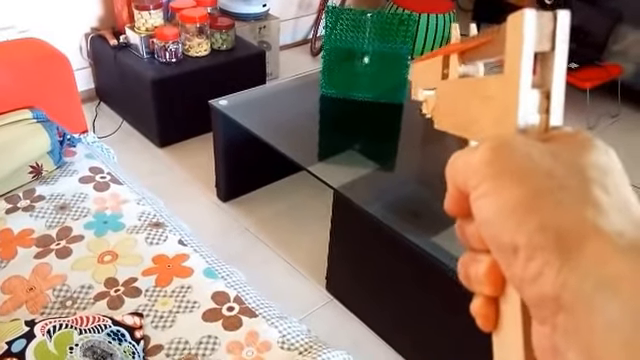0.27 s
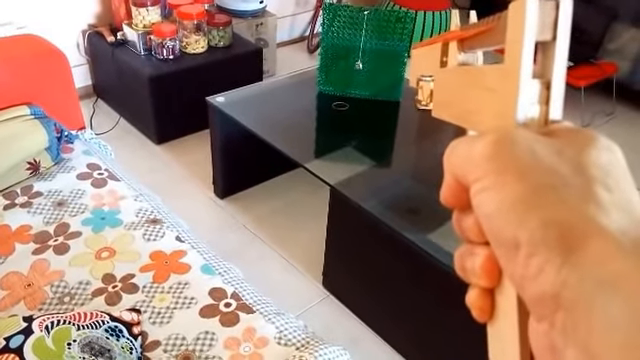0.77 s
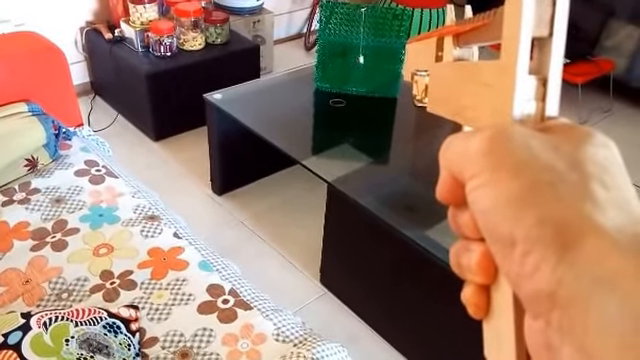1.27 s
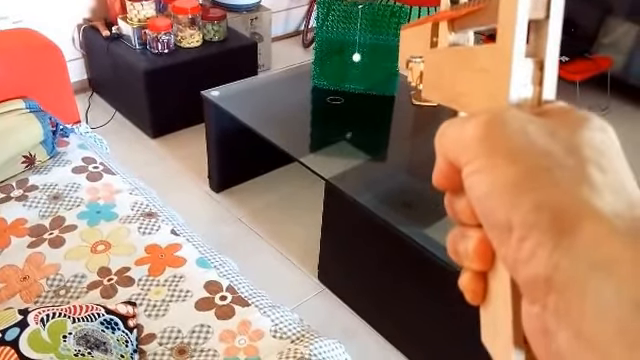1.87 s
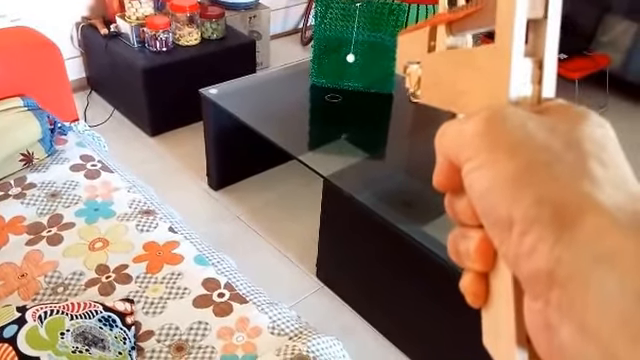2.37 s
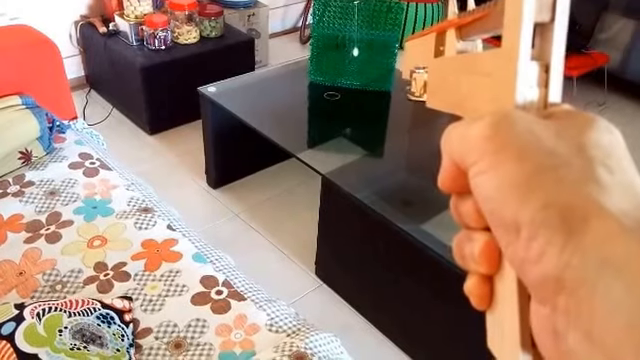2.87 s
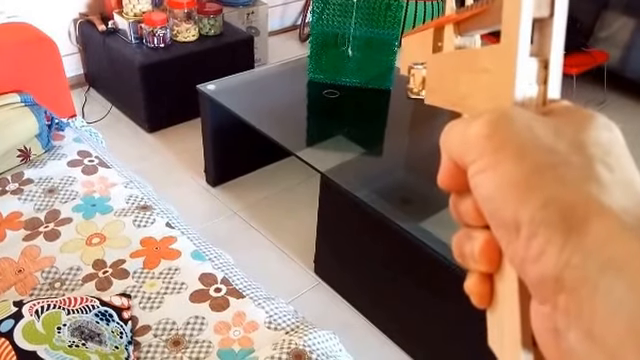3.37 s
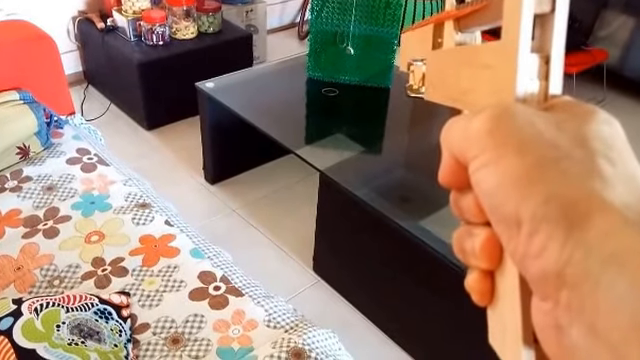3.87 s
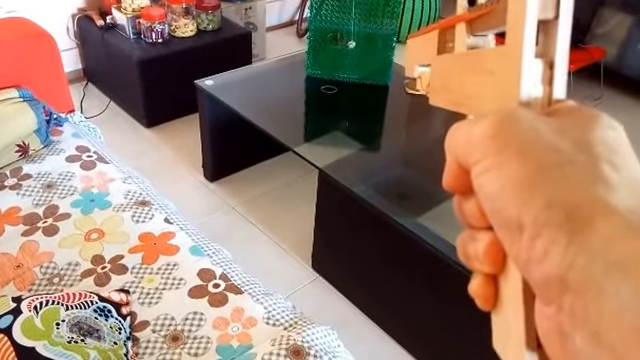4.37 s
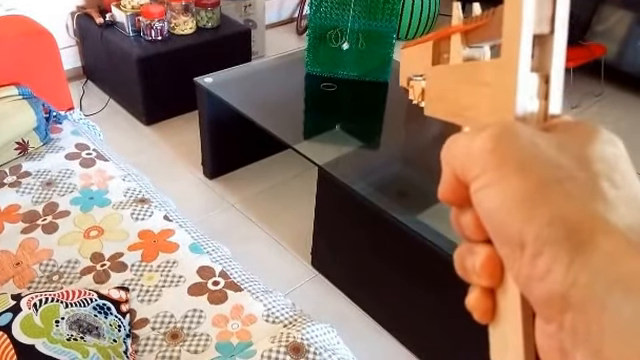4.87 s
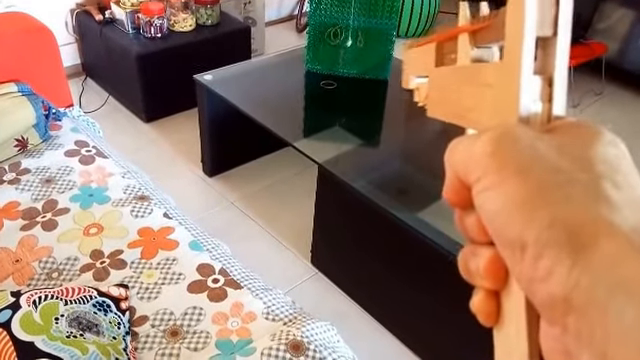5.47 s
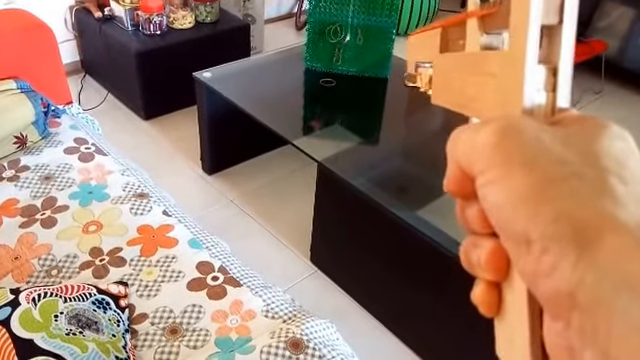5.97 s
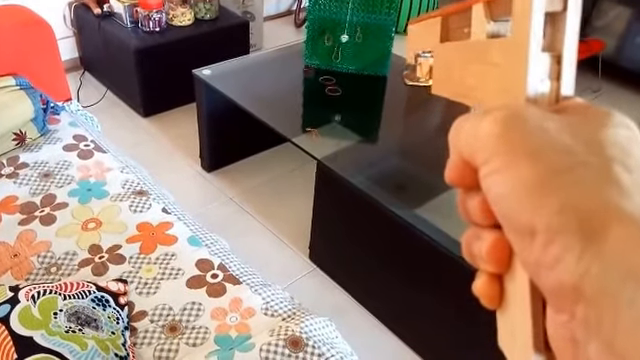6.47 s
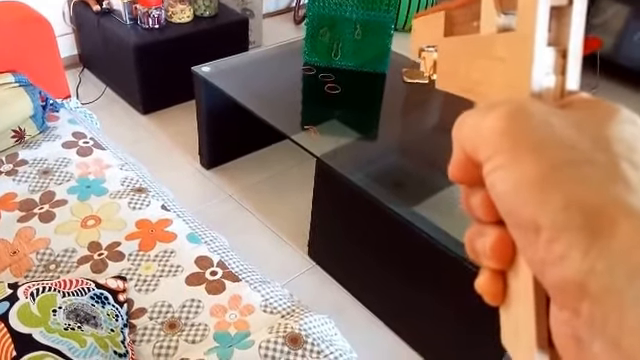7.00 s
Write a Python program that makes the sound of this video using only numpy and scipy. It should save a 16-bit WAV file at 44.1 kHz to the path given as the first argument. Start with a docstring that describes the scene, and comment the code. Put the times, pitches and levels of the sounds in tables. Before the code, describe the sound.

Eight rubber band shots from a wooden gun, very near the microphone: light trigger ticks, scratchy rubber slip, crisp snap, then a band slapping a flapping panel across the room, and a hard wooden clack as the trigger returns. Two isolated shots come first, then a quickening run with deeper thuds and grip rumble. A high little bell rings at the end in a lively tiled living room.

```python
"""A wooden rubber band gun fires eight times next to a hand-held camera in a tiled living room.
Around the shots the trigger ticks and clacks as wood on wood: a short crack of noise and a ringing frame.
Rubber rubs and slips off the catch; each band slaps a hanging target, whose panel thuds and flaps.
The last band strikes a small bell, a set of damped modes. Squeezes shake the camera and a hand brushes
and bumps its right port, as low noise and pulses; the room rumbles, hums and whines faintly."""
import sys
import numpy as np
from scipy import signal
from scipy.fft import rfft, irfft, next_fast_len
from scipy.io import wavfile
from scipy.ndimage import map_coordinates

SR = 44100
rng = np.random.default_rng(int(sys.argv[2]) if len(sys.argv) > 2 else 0)


def dump_mix(stems):
    """Bounce the given channels to the path in sys.argv[1] as a 16-bit WAV at rate SR."""
    frames = np.atleast_2d(stems).T  # one column per channel
    limited = np.clip(frames, -1, 1)  # hard clip at full scale
    pcm = np.round(limited * 32767).astype(np.int16)
    wavfile.write(sys.argv[1], SR, pcm)


N = 319284
T = np.arange(int(0.8 * SR)) / SR  # time axis of one short sound, s

# All levels are relative gains; a left-right level is positive when the left port is louder.

# the catch lets a band go: start_s, snap_level_db, rub_build_up_s, grip_shake_db, squeeze_length_s
SHOTS = [(0.2706, -31, 0.093, -43, 0.61), (2.5715, -24.5, .018, -41, 0.43),
         (4.1384, -28, 0.044, -38.5, 0.57), (4.5508, -24.5, 0.017, -35, .6), (5.495, -23, 0.046, -32, 0.31),
         (5.9218, -22, 0.042, -38.5, 0.3), (6.363, -20, 0.016, -35.5, 0.73),
         (6.8303, -18.5, 0.023, -32, .42)]
# light contacts as the trigger takes up its slack: start_s, level_db, treble_db, ring_hz
TICKS = [(0.558, -49.5, -5, 1680), (2.555, -46, 4, 1630), (2.7633, -37.5, 0, 3220), (4.3237, -36, -1, 1700),
         (4.5114, -33.5, -8.5, 3360), (5.4387, -44, -10, 1660), (5.707, -37.5, -11, 2310),
         (5.8672, -38, -11, 2980), (6.0841, -28, -2, 2270), (6.319, -40.5, -6, 1570),
         (6.7846, -32, -3.5, 1610)]
# the trigger springs back against the frame, sometimes twice: start_s, level_db, treble_db, rattle_s
RESETS = [(0.59, -18.5, -0.5, 0.0035), (0.595, -24, 1.5, .0059), (2.8043, -16.5, 2, 0.0054),
          (4.3528, -19, 1.5, 0.0064), (4.7348, -22.5, -3, .0008), (4.7377, -16, 1, 0.0031),
          (5.7353, -16, 1.5, .0015), (6.1238, -15, 0, 0.0013), (6.5724, -14, 2, 0.00043),
          (7.0262, -15.5, 3.5, 0.0014)]
# the gun faces the left port, with a balance that varies with pitch: frequency_hz, left_right_db
GUN_PAN = [(1000, -0.5), (1550, 1.5), (2600, 5.5), (4200, 0), (7500, -1), (14000, 0)]
SNAP_TREBLE_DB, SNAP_RATTLE_S, SNAP_ROOM_DB = 6.5, 0.0012, 1  # every snap is short and bright
TICK_RING_DB, TICK_WIDTH_HZ = 4.5, 200  # boost at a light contact's own resonance, and its half width
RESET_ROOM_DB = -3


def gun():
    """Wooden contacts: trigger ticks, the snap of the catch and the heavier return of the trigger."""
    out = np.zeros((2, N))
    for start_s, level_db, treble_db, ring_hz in TICKS:
        tick = clack(treble_db, rattle_s=0.0009, room_db=-2.5, crack_db=2)

        def resonance(hz):
            """The tick's level, lifted around its own resonance."""
            return amp(level_db + TICK_RING_DB / (1 + ((hz - ring_hz) / TICK_WIDTH_HZ) ** 2))

        add(out, start_s, filtered(tick, resonance))
    for start_s, level_db, *_ in SHOTS:
        add(out, start_s, amp(level_db) * clack(SNAP_TREBLE_DB, SNAP_RATTLE_S, SNAP_ROOM_DB))
    for start_s, level_db, treble_db, rattle_s in RESETS:
        add(out, start_s, amp(level_db) * clack(treble_db, rattle_s, RESET_ROOM_DB))
    return filtered(out, lambda hz: pan(along(GUN_PAN, hz)))


# spectrum of the wooden crack: frequency_hz, level_db (per Hz)
CRACK = [(100, -57), (500, -8), (1100, -3), (1600, 2.5), (3500, 1), (7000, -2), (10000, -13.5),
         (15500, -14.5)]
# modes of the wooden frame, before random scatter: frequency_hz, level_db, t60_s
FRAME = [(860, -11.5, 0.017), (1585, 4, 0.023), (2004, -2.5, 0.035), (2276, 1.5, 0.026), (2787, 4.5, 0.013),
         (3283, 1.5, 0.017), (4100, 1, 0.017), (4600, 1, 0.0051), (5880, -10, 0.026), (6300, 7, 0.0052),
         (7480, 2.5, 0.0071), (9800, -23, 0.0048)]
# what the gun radiates all round and so sends into the room; also colours the rub: frequency_hz, level_db (per Hz)
RADIATED = [(200, -19), (600, -6), (1150, -6.5), (1550, -3.5), (2400, 1), (4200, 1), (6000, -4), (8500, -8),
            (11500, -13), (15500, -22)]


def clack(treble_db, rattle_s, room_db, crack_db=0, crack_t60=0.024, frame_pan_db=8, crack_pan_db=-2):
    """Wood on wood: a brief crack of noise, the damped modes of the frame, and the room's answer."""
    contact = fade(crack_t60, rattle_s) + amp(-4) * fade(0.0058, hold=0.00011)  # extra weight at the onset
    crack = burst(noise(CRACK, len(T)) * contact)
    frame = burst(ring(FRAME, scatter_db=3.0) * (1 - np.exp(-T / 0.00032)))
    tail = amp(3.0) * room(RADIATED) + amp(-5.5) * echo(frame)
    direct = frame * pan(frame_pan_db) + amp(crack_db) * crack * pan(crack_pan_db)
    # a tilt that leaves 4.5 kHz unchanged
    return filtered(direct + amp(room_db) * tail, lambda hz: amp(treble_db * (3 * hz / (hz + 9000) - 1)))


RUB_DB, RUB_FALL_S = -15.5, 0.017  # rub level relative to its snap; how fast it dies after the slip


def rubber():
    """A scratchy rub: noise that swells until the band slips free, stronger before a harder snap."""
    t = np.arange(N) / SR
    force = np.zeros(N)
    for slip_s, snap_db, rise_s, *_ in SHOTS:
        time_constant_s = np.where(t < slip_s, rise_s, RUB_FALL_S)
        force += amp(snap_db + RUB_DB) * np.exp(-np.abs(t - slip_s) / time_constant_s)
    scratch = amp(2.0 * wobble(220))
    return force * scratch * noise(RADIATED, N)


# a band lands on the target: start_s, thud_level_db, thud_pitch_hz, flap_level_db
HITS = [(0.334, -28, 356, -26), (2.6314, -24.5, 390, -24.5), (4.197, -42, 265, -23.5),
        (4.609, -31.5, 369, -28), (5.5514, -12.5, 366, -23.5), (5.9754, -11.5, 379, -21.5),
        (6.4096, -19.5, 294, -22), (6.895, -25, 332, -27)]
# the band bounces on the panel: start_s, level_db, pitch_hz
BOUNCES = [(0.376, -38, 583), (4.657, -31.5, 598), (6.467, -45, 420)]
# spectrum of the slap: frequency_hz, level_db (per Hz)
SLAP = [(200, -26), (900, -1.5), (1700, -0.5), (2600, 1), (6000, -1.5), (9500, -3), (13000, -5),
        (16000, -10.5)]
# spectrum of the flapping panel, before it shifts with the thud: frequency_hz, level_db (per Hz)
FLAP = [(50, -20), (130, 7.5), (220, -4), (340, 10), (480, 1), (620, 2.5), (850, -5.5), (1500, -55),
        (4000, -81.5)]
SLAP_DB, SLAP_FOLLOWS = -23.5, 0.3  # slap of an average shot; dB more for each dB of a harder snap
FLAP_HZ, FLAP_FOLLOWS = 375, 0.33  # thud pitch with unshifted flapping; exponent of the shift with pitch


def target():
    """The band slaps the target as a noise burst, harder after a harder snap; the panel thuds and flaps."""
    out = np.zeros((2, N))
    snap_db = np.array(SHOTS)[:, 1]
    for (start_s, thud_db, pitch_hz, flap_db), harder_db in zip(HITS, snap_db - snap_db.mean()):
        slap_envelope = (fade(0.014, hold=0.0017) + fade(0.062)) * (1 - np.exp(-T / 0.00051))
        slap = burst(noise(SLAP, len(T)) * slap_envelope)
        add(out, start_s, amp(SLAP_DB + SLAP_FOLLOWS * harder_db) * (slap + amp(3.5) * room(SLAP)))
        add(out, start_s, amp(thud_db) * thud(pitch_hz))
        shift = (pitch_hz / FLAP_HZ) ** FLAP_FOLLOWS
        colour = [(hz * shift, level_db) for hz, level_db in FLAP]
        flap = burst(noise(colour, len(T)) * fade(0.26) * (1 - np.exp(-(T / 0.0018) ** 2)))
        add(out, start_s, amp(flap_db) * (flap + amp(3.5) * room(colour)))
    for start_s, level_db, pitch_hz in BOUNCES:
        add(out, start_s, amp(level_db) * thud(pitch_hz))
    return out


def thud(hz, swell_s=0.0032):
    """The panel takes a few cycles to swing out, and the room answers in a band around its note."""
    swing = burst((T / swell_s) ** 3 * np.exp(-T / swell_s) * np.sin(2 * np.pi * hz * T))[None]
    band = [(hz / 2, -45), (hz / 1.25, -10), (hz, 0), (hz * 1.15, -2), (hz * 1.35, -17), (hz * 2, -45)]
    return swing + room(band)


# the band, then the swinging clapper, strike the bell: start_s, level_db
STRIKES = [(6.8776, -0.5), (6.893, -10), (6.912, -6.5), (6.957, -11.5)]
# the bell's lasting modes, in closely split groups, before random scatter: frequency_hz, level_db, t60_s
BELL = [(4310, -6, .36), (4358, -1, .54), (4388, -2, .48), (4450, -6, .22), (7526, -12, .42),
        (7568, -12, .4), (8185, -8, .22), (8254, -5, .48), (8296, -4, .48), (8340, -8, .4),
        (12190, -13, .34), (12283, -12, .36), (12420, -11, .2), (14510, -16, .36), (14690, -15, .3)]
# spectrum of the click and clang of a strike: frequency_hz, level_db (per Hz)
CLANG = [(800, -52), (2000, -23), (3500, -19), (4100, -5), (4390, 11), (4750, -7), (5500, -11.5),
         (7540, -9), (8300, 3), (9200, -12), (11300, -17), (12300, -7), (13600, -14), (14700, -18)]


def bell():
    """A small bell jangles: each strike adds a hard click and a bright clang, and rings the modes anew."""
    out = np.zeros((2, N))
    for start_s, level_db in STRIKES:
        tone = burst(ring(BELL, scatter_db=0.5))
        clang = burst(noise(CLANG, len(T)) * (fade(0.054) + amp(17) * fade(0.0032)))
        direct = amp(-3.5) * tone + amp(-17) * clang
        tail = amp(-10.5) * echo(tone) + amp(-6.0) * room(CLANG)
        add(out, start_s, amp(level_db) * (direct + tail))
    return out


# the hand brushes the right port: start_s, length_s, level_db
BRUSHES = [(4.668, 0.33, -28.5), (5.135, .03, -32), (5.435, 0.31, -31.5), (6.433, 0.35, -29),
           (6.913, 0.2, -23)]
# bumps of the hand at the right port: centre_s, level_db, pitch_hz, half_length_s
BUMPS = [(4.677, -17, 61, 0.014), (4.828, -8, 116, 0.0052), (4.851, 0.5, 76, 0.0097),
         (4.964, -19, 100, 0.044), (6.942, -14, 90, 0.016), (6.981, -12, 95, .008)]
# spectrum of handling noise: frequency_hz, level_db (per Hz)
HANDLING = [(20, -26), (40, -8.5), (58, 6.5), (90, -6.5), (150, -12.5), (300, -23.5), (1000, -41),
            (3000, -92)]
SQUEEZE_LEAD_S = 0.094  # the hand tenses before each shot
RUMBLE_DB, RUMBLE_SWING_DB = -50, 4.5  # the resting grip is never quite still


def hand():
    """Squeezes shake the whole camera as low noise; brushes and pulsed bumps reach mainly the right port."""
    t = np.arange(N) / SR
    squeezes = np.max([amp(shake_db) * swell(start_s - SQUEEZE_LEAD_S, length_s)
                       for start_s, _, _, shake_db, length_s in SHOTS], axis=0)
    resting = amp(RUMBLE_DB + RUMBLE_SWING_DB * wobble(6))
    shake = np.hypot(squeezes, resting) * noise(HANDLING, N)
    brush_level = sum(amp(level_db) * swell(start_s, length_s) for start_s, length_s, level_db in BRUSHES)
    brushes = brush_level * noise(HANDLING, N)[0]
    bumps = np.zeros(N)
    for centre_s, level_db, pitch_hz, half_s in BUMPS:
        pulse = np.exp(-((t - centre_s) / half_s) ** 2 / 2)
        bumps -= amp(level_db) * pulse * np.cos(2 * np.pi * pitch_hz * (t - centre_s))
    return shake + (brushes + bumps) * amp([[-20], [0]])


GRIP_RISE_S, GRIP_FALL_S = 0.036, 0.041  # time constants of a hand movement


def swell(start_s, hold_s):
    """A movement of the hand: it rises exponentially up to start_s, holds and dies away."""
    t = np.arange(N) / SR - start_s
    return np.exp(np.minimum(t, 0) / GRIP_RISE_S - np.maximum(t - hold_s, 0) / GRIP_FALL_S)


# course of the room noise: time_s, level_db
BACKGROUND = [(0, -46), (.75, -38.5), (.88, -52), (1, -43.5), (1.55, -45.5), (3.35, -46), (3.8, -43),
              (5, -37.5), (5.3, -43.5), (7.24, -37.5)]
# spectrum of the room noise: frequency_hz, level_db (per Hz)
AMBIENCE = [(15, -76), (25, -48), (40, -15), (64, 0), (87, -14), (206, -12.5), (263, -17.5), (363, -17.5),
            (677, -27), (734, -23.5), (1100, -29.5), (3820, -36), (11300, -42), (14800, -38.5),
            (16000, -46)]
# balance of the room noise: frequency_hz, left_right_db
AIR_PAN = [(60, 1), (110, -3.5), (200, 0.5), (380, -1.0), (700, 0), (1290, 1), (2380, 3.5), (4400, 3.5),
           (8120, 4.5), (15000, -4.5)]
# spectrum of the sizzle: frequency_hz, level_db (per Hz)
SIZZLE = [(2500, -41), (3600, -9), (3950, 19), (4300, -11), (5300, -70), (6300, -20), (7500, 11),
          (9000, -34)]
# appliance hum and whine: pitch_hz, level_db (rms, before panning), left_right_db
TONES = [(725, -63.5, -4), (14410, -69, -27)]


def ambience():
    """Uneven low room noise, a faint wavering sizzle of noise, and drifting sines for hum and whine."""
    t = np.arange(N) / SR
    air = filtered(noise(AMBIENCE, N), lambda hz: pan(along(AIR_PAN, hz)))
    low = filtered(air, lambda hz: 1 / (1 + (hz / 400) ** 4))
    air = air + low * (amp(0.29 * wobble(3.1)) - 1)  # the bass comes and goes
    sizzle = amp(-70 + 2.2 * wobble(2.7)) * noise(SIZZLE, N) * pan(3.3)
    tones = np.zeros((2, N))
    for pitch_hz, level_db, side_db in TONES:
        drift = np.cumsum(rng.standard_normal(N)) / np.sqrt(SR)
        sine = np.sqrt(2) * np.sin(2 * np.pi * pitch_hz * t + 4 * drift)
        tones += amp(level_db) * pan(side_db) * sine
    return amp(curve(BACKGROUND)) * air + sizzle + tones


# decay time of the room: frequency_hz, t60_s
ROOM_T60 = [(150, 1), (400, 0.58), (1400, 0.54), (3700, 0.58), (8000, 0.54), (14000, 0.41)]


def room(spectrum, build_s=0.0061):
    """The diffuse answer of the room to a short sound: it builds up, then each frequency dies at its own speed."""
    hz, t, cells = signal.stft(noise(spectrum, len(T)), SR, nperseg=256)
    decay = np.exp(-np.log(1000) * t / along(ROOM_T60, hz)[:, None])
    tail = signal.istft(cells * decay, SR, nperseg=256)[1][:, :len(T)]
    return burst(tail * (1 - np.exp(-(T / build_s) ** 2)))


# spectrum of the room's answer to a ringing source: frequency_hz, level_db (per Hz)
ROOM_COLOUR = [(100, 15), (350, -41), (900, 10), (4200, 5), (16000, 6)]


def echo(x):
    """The room's answer to a ringing source: its left channel convolved with a diffuse tail."""
    return burst(signal.fftconvolve(x[:1], room(ROOM_COLOUR), axes=1)[:, :len(T)])


def ring(modes, scatter_db):
    """Damped modes; each reaches the two ports with its own strength and a slightly different phase."""
    total = np.zeros((2, len(T)))
    for hz, level_db, t60 in modes:
        gain = amp(level_db + scatter_db * rng.standard_normal((2, 1)))
        phase = rng.random() + 0.12 * rng.standard_normal((2, 1))  # cycles
        total += gain * fade(t60) * np.sin(2 * np.pi * (hz * T + phase))
    return total


# how alike the two ports are: frequency_hz, left_right_likeness (0 to 1)
ALIKE = [(60, 0.98), (130, 0.95), (290, 0.89), (640, 0.42), (1400, 0.011)]


def noise(spectrum, size):
    """Stereo noise of rms 1; the two ports agree only in the bass."""
    def mid_side(hz):
        """Shape the spectrum and share it between the middle and the sides."""
        turn = np.arccos(np.clip(along(ALIKE, hz), -1, 1)) / 2
        return amp(along(spectrum, hz)) * [np.cos(turn), np.sin(turn)]

    mid, side = filtered(rng.standard_normal((2, size)), mid_side)
    return unit(np.array([mid + side, mid - side]))


def wobble(rate):
    """A smooth random curve, rate knots a second."""
    return map_coordinates(rng.standard_normal(int(N * rate / SR) + 4), [np.arange(N) * rate / SR])


def fade(t60, hold=0):
    """Full level for hold seconds, then an exponential decay."""
    return np.exp(-np.log(1000) * np.maximum(T - hold, 0) / max(t60, 1e-4))


def amp(db):
    """Decibels to gain."""
    return 10 ** (np.asarray(db) / 20)


def unit(x):
    """Scale to rms 1."""
    return x / np.sqrt(np.mean(x ** 2) + 1e-20)


def burst(x):
    """Scale each channel to the energy of 10 ms at rms 1."""
    return x / np.sqrt(np.sum(x ** 2, axis=-1, keepdims=True) / (0.01 * SR) + 1e-20)


def along(points, hz):
    """Read (Hz, value) points on a log axis."""
    f, v = np.transpose(points)
    return np.interp(np.log(hz + 1), np.log(f + 1), v)


def curve(rows):
    """One value per sample from (s, value) rows."""
    return np.interp(np.arange(N) / SR, *np.transpose(rows))


def pan(db):
    """Left and right gains for a level difference."""
    return amp(np.array([[1], [-1]]) * db / 2)


def filtered(x, response):
    """x times a response of frequency."""
    n = x.shape[-1]
    m = next_fast_len(n + 4096)
    return irfft(rfft(x, m) * response(np.fft.rfftfreq(m, 1 / SR)), m)[..., :n]


def add(track, s, x):
    """Mix x into the track at time s."""
    part = track[:, round(s * SR):][:, :len(T)]
    part += x[:, :part.shape[1]]


def scene():
    """Everything at the two ports."""
    return gun() + rubber() + target() + bell() + hand() + ambience()


TOP_HZ = 16000  # band limit


def record(dry):
    """The loudest peaks round off at full scale, then everything above the band limit is cut."""
    clipped = dry / (1 + np.abs(dry) ** 6) ** (1 / 6)
    return filtered(clipped, lambda hz: hz < TOP_HZ)


dry = scene()
out = record(dry)
dump_mix(out)
```